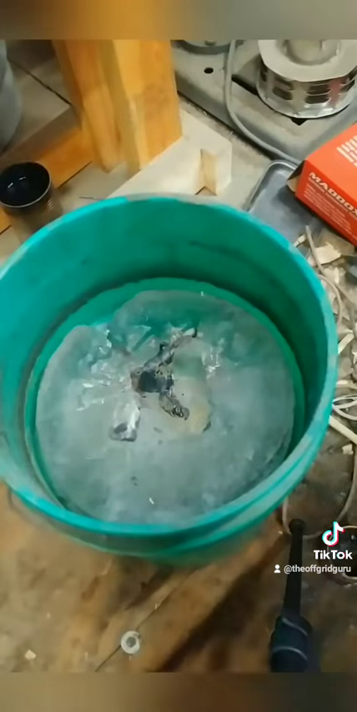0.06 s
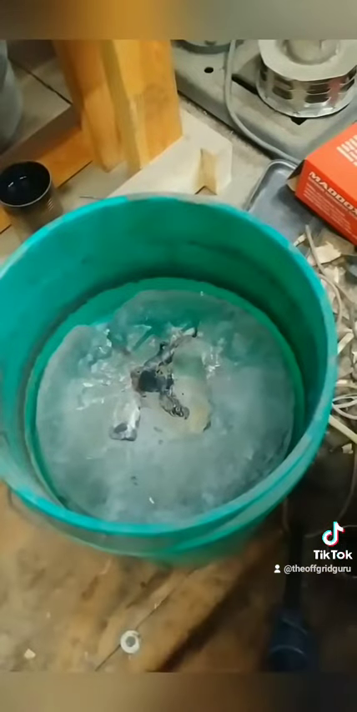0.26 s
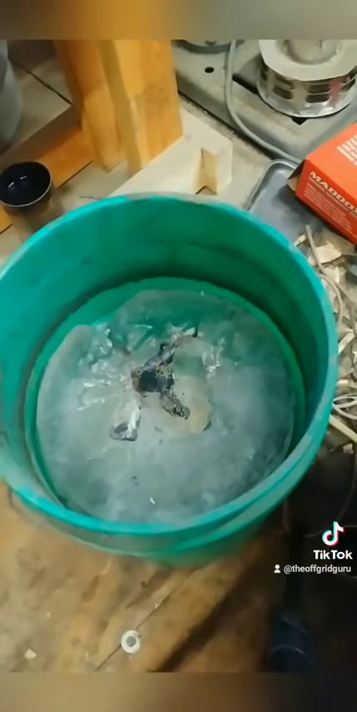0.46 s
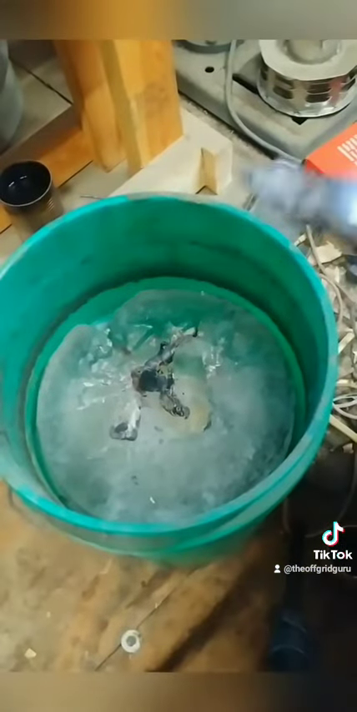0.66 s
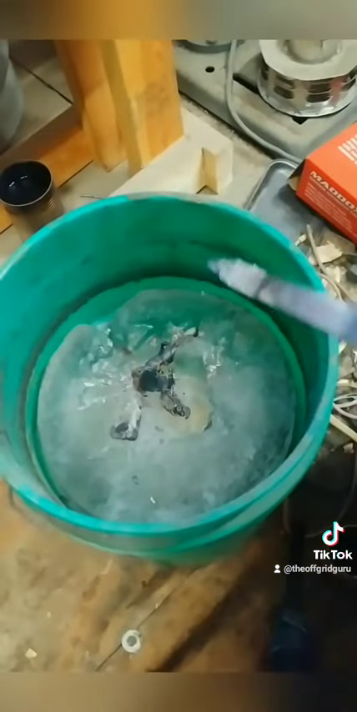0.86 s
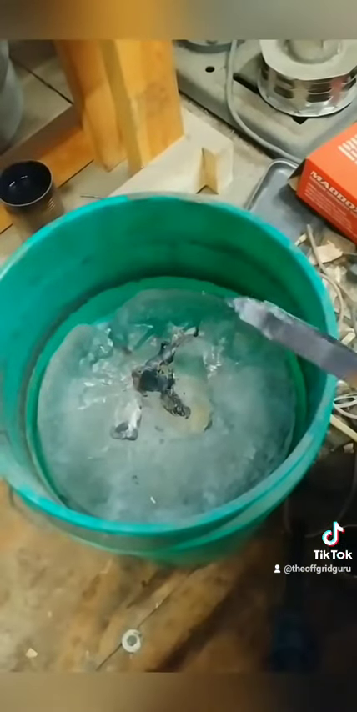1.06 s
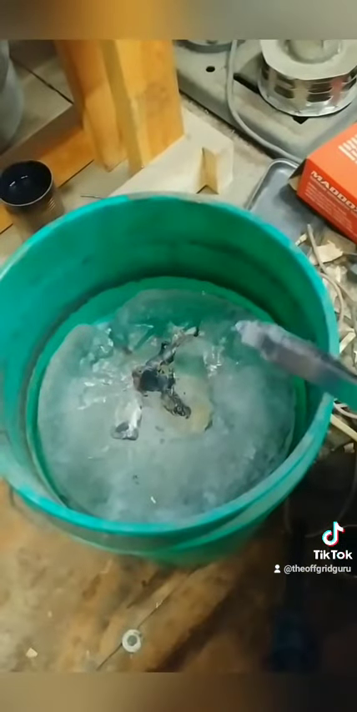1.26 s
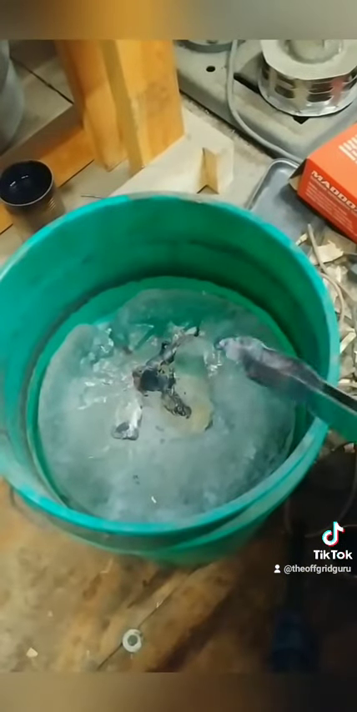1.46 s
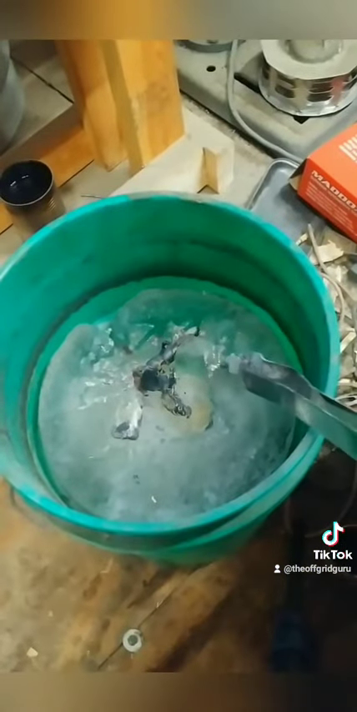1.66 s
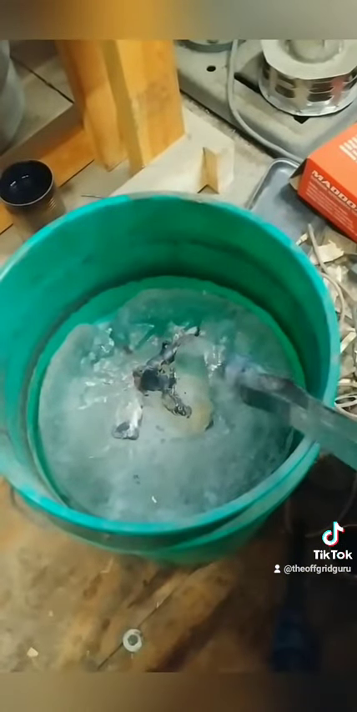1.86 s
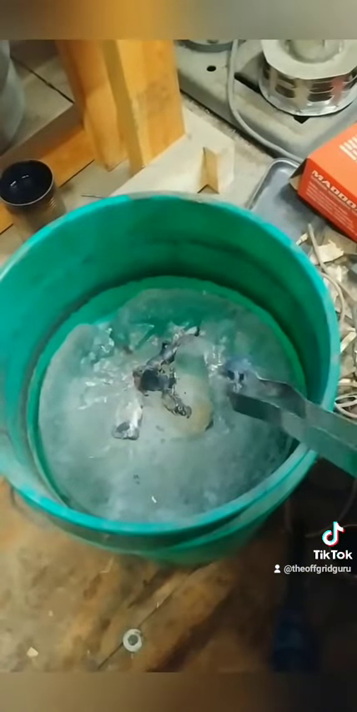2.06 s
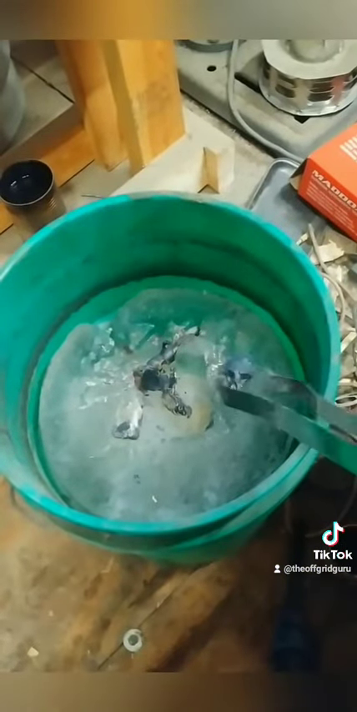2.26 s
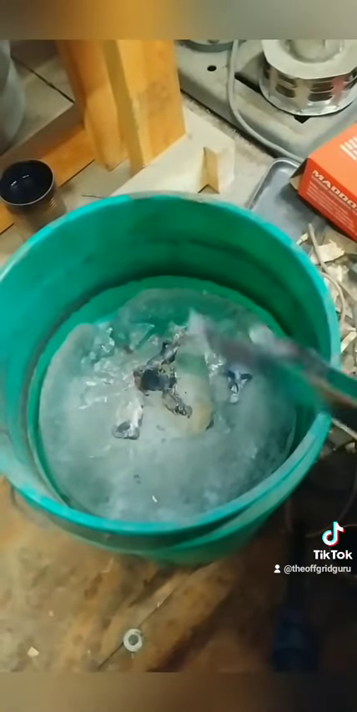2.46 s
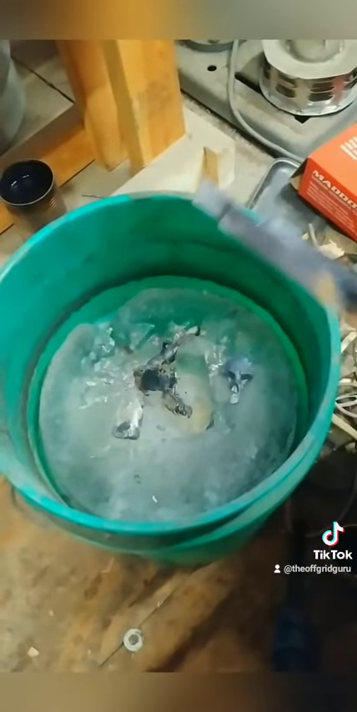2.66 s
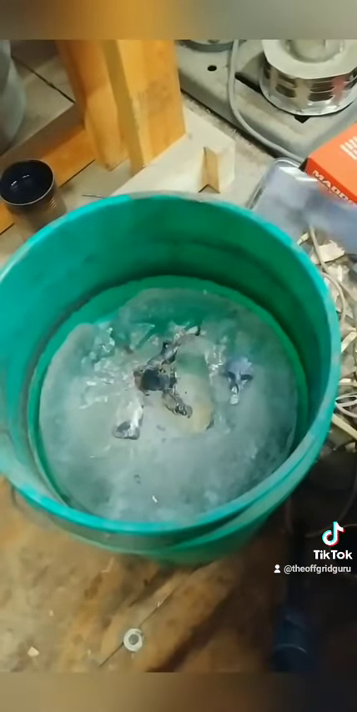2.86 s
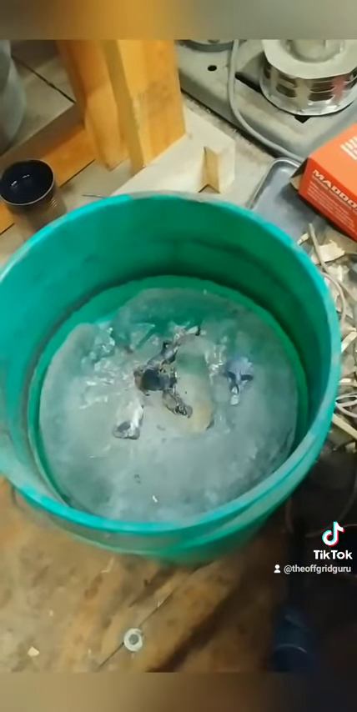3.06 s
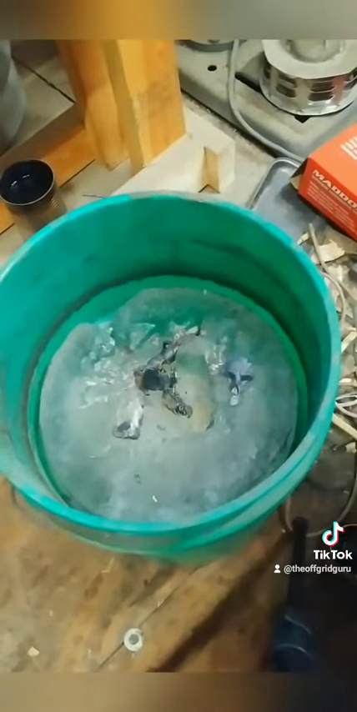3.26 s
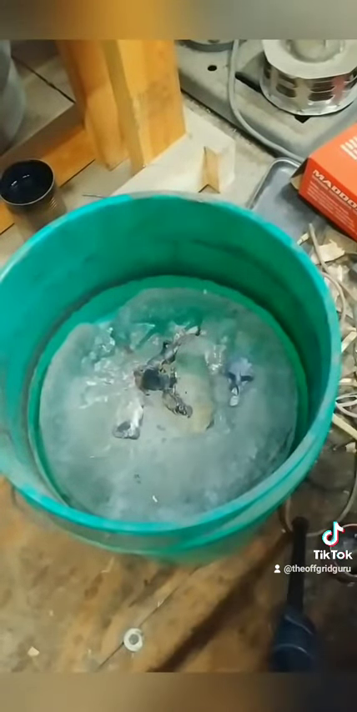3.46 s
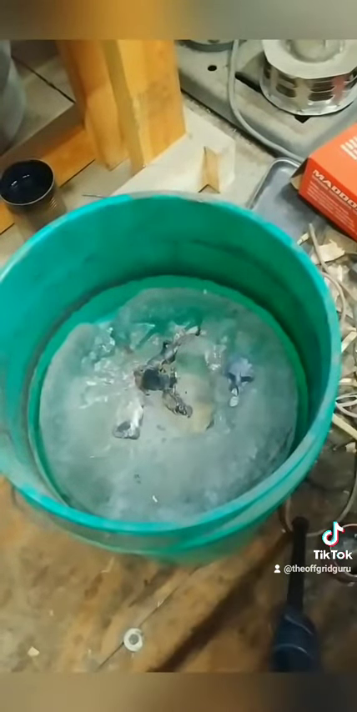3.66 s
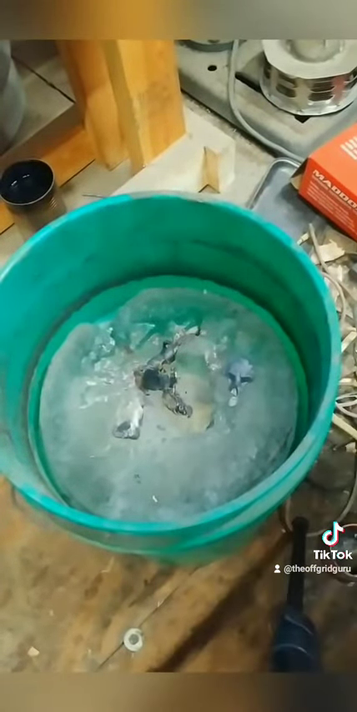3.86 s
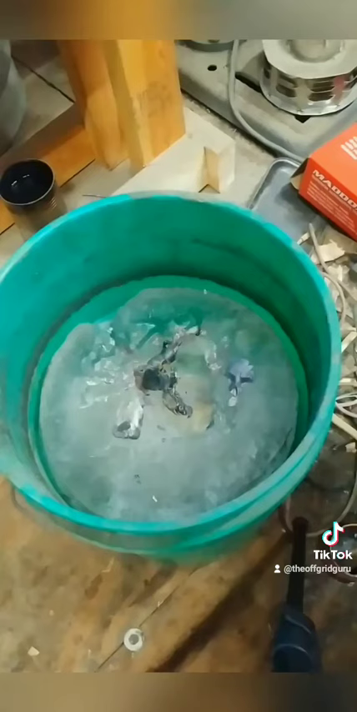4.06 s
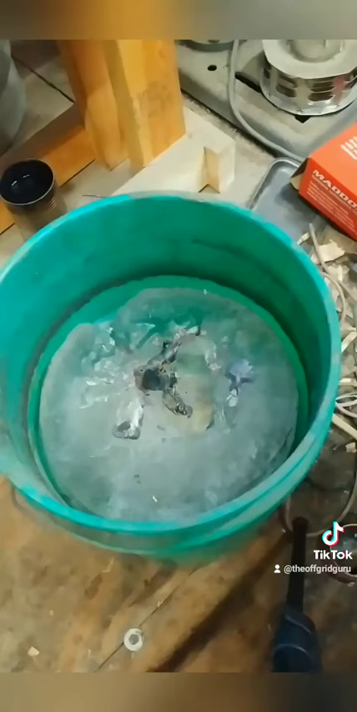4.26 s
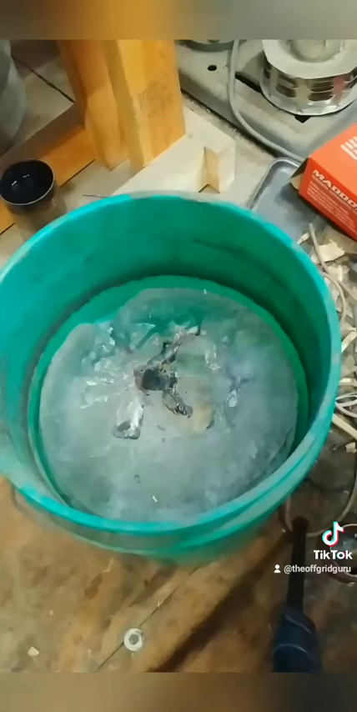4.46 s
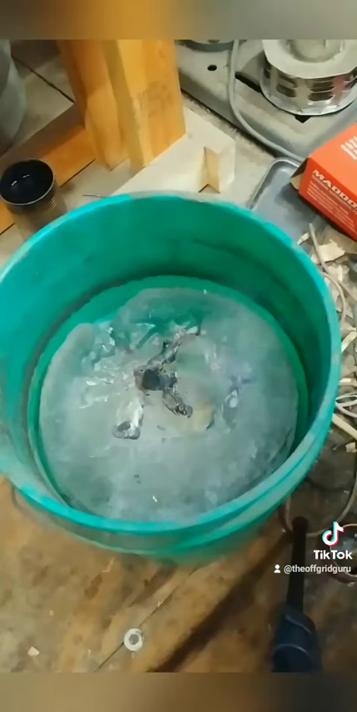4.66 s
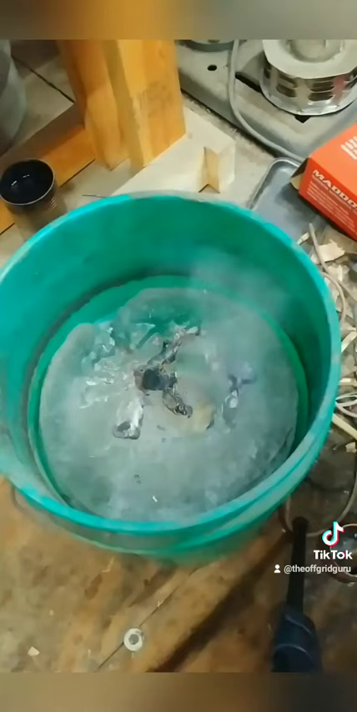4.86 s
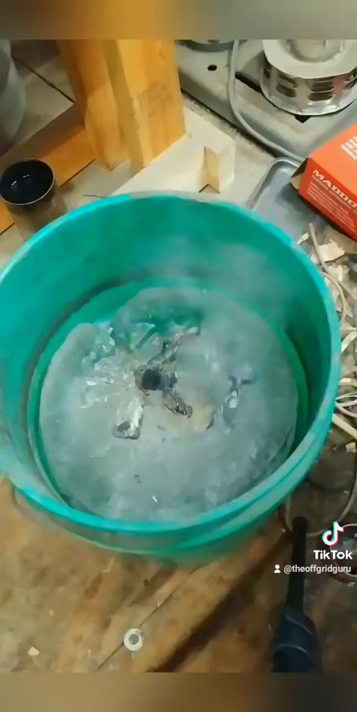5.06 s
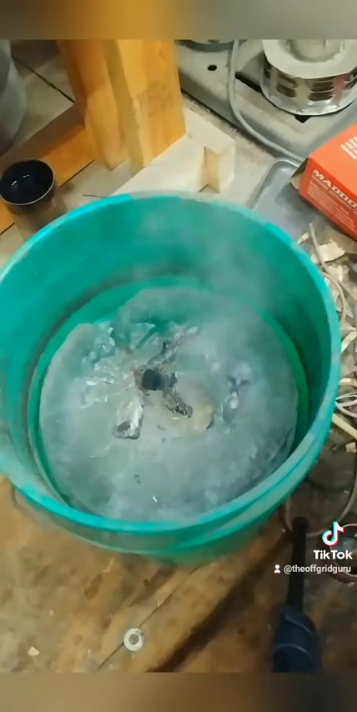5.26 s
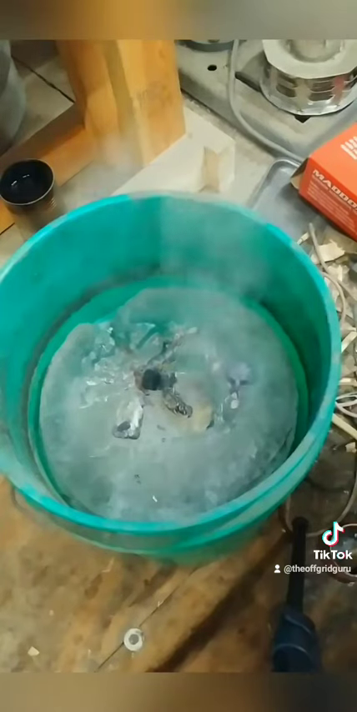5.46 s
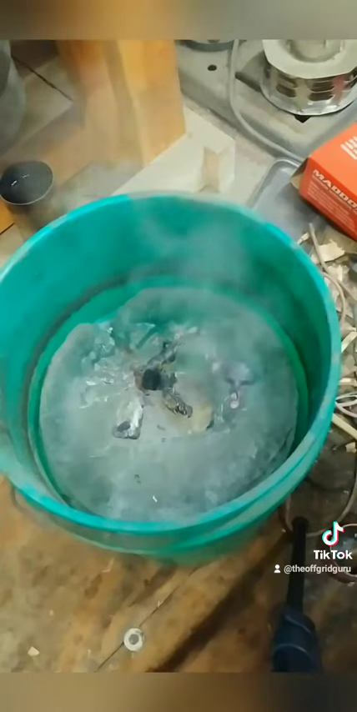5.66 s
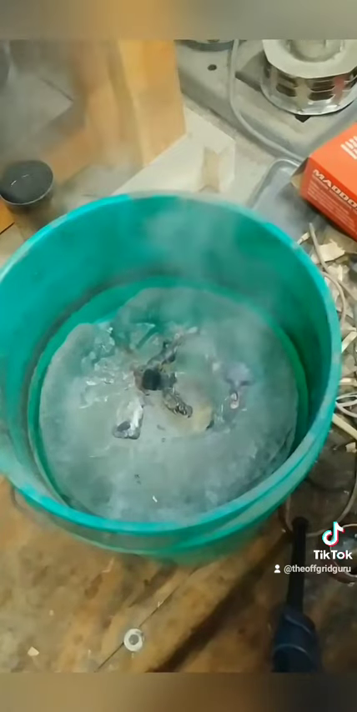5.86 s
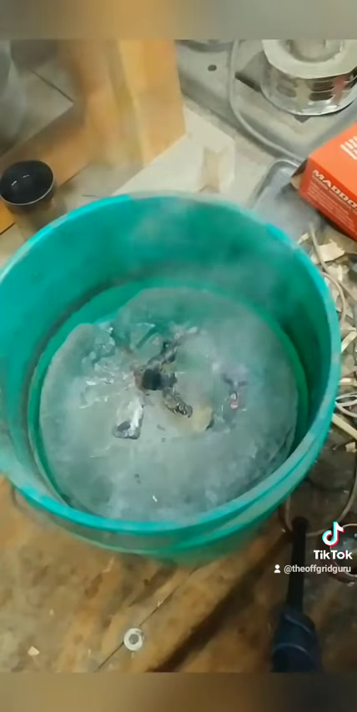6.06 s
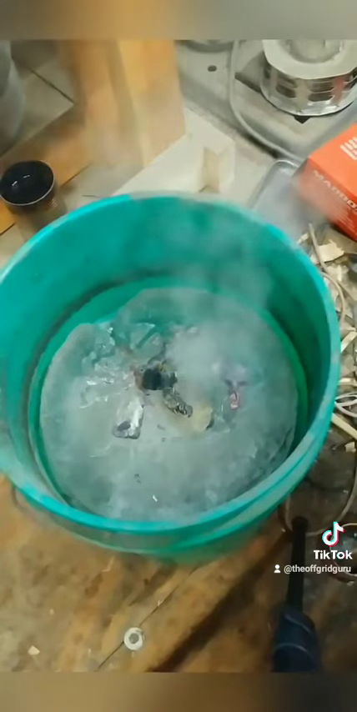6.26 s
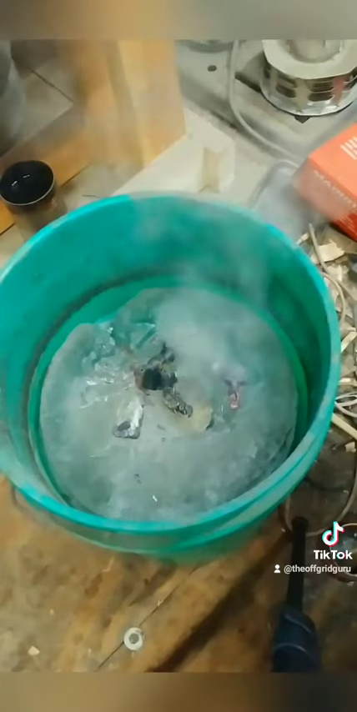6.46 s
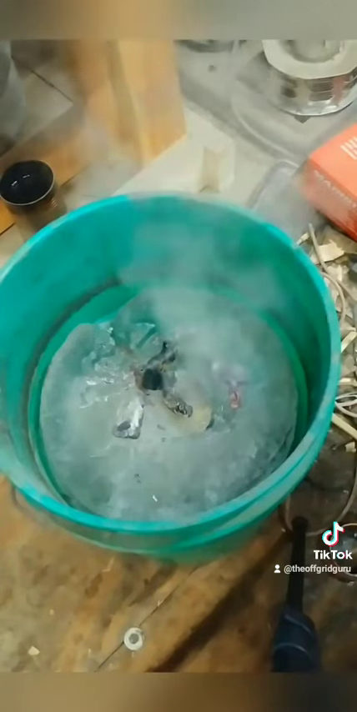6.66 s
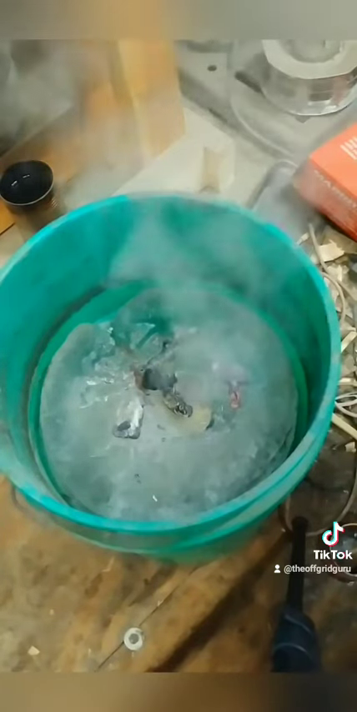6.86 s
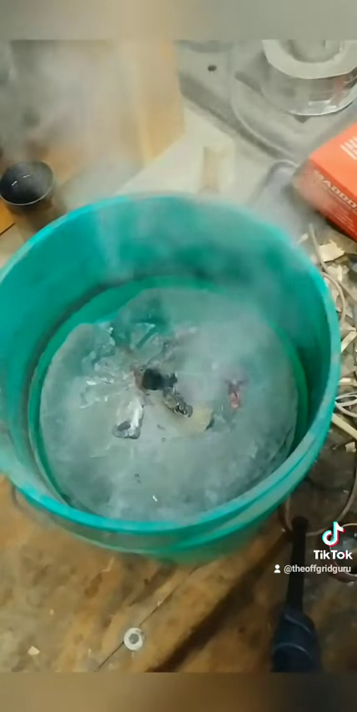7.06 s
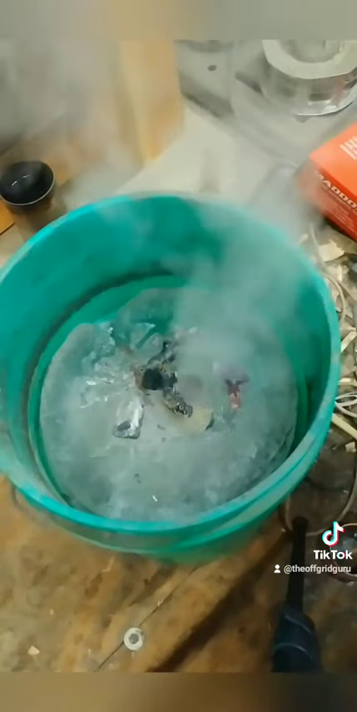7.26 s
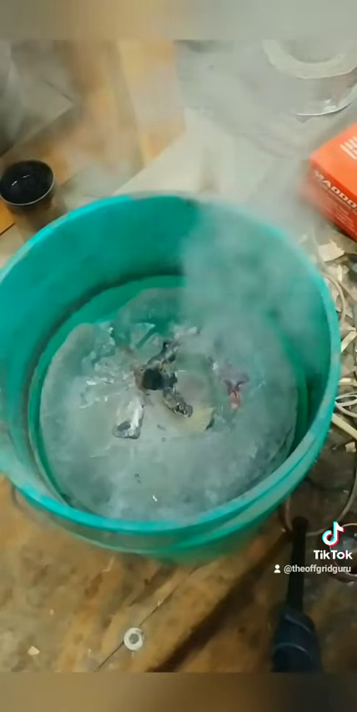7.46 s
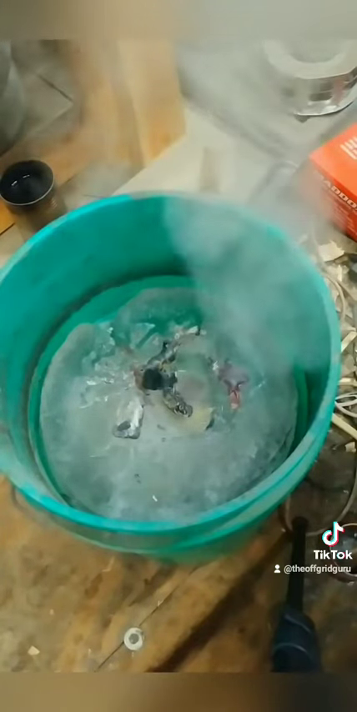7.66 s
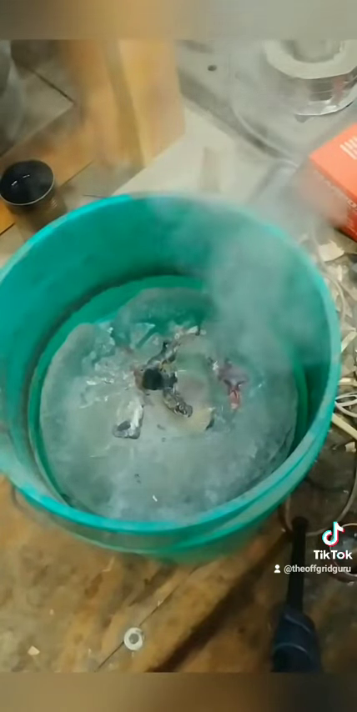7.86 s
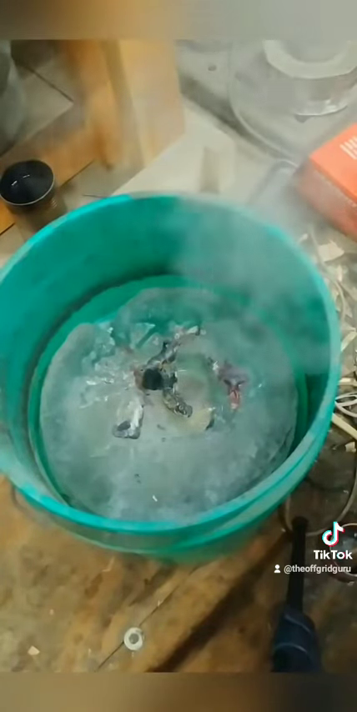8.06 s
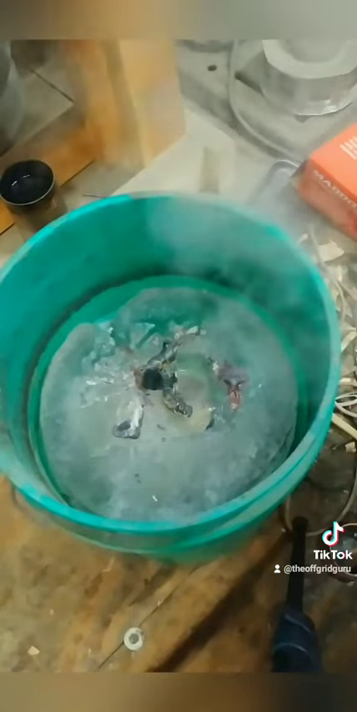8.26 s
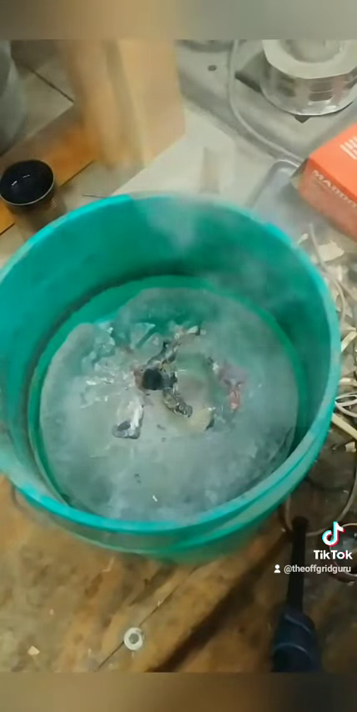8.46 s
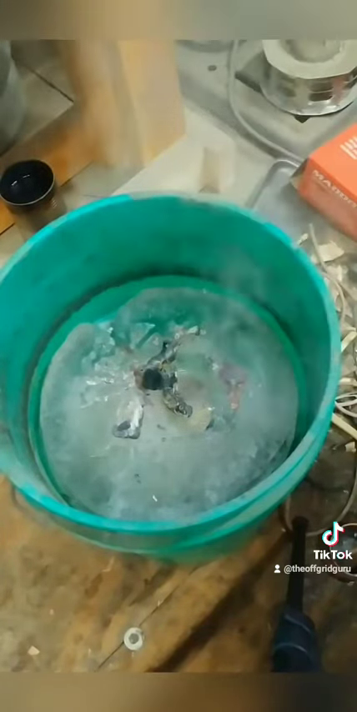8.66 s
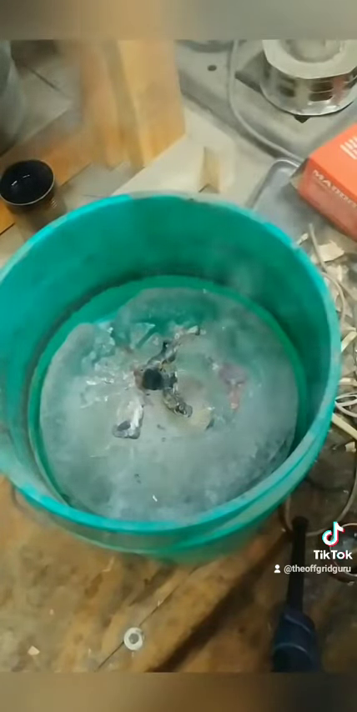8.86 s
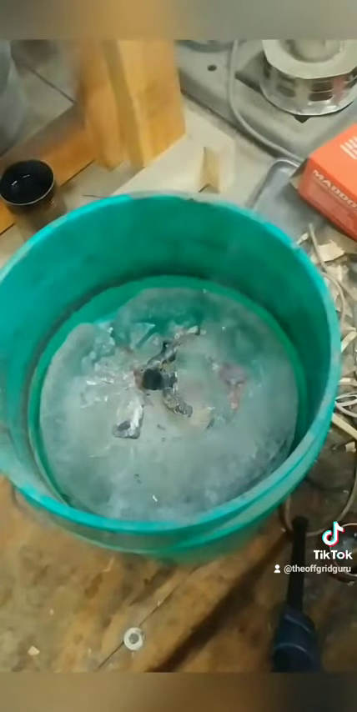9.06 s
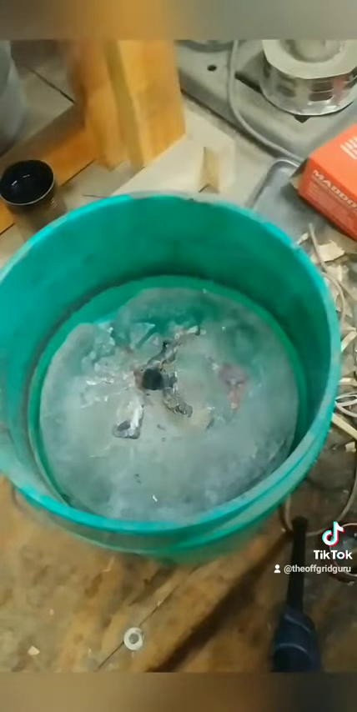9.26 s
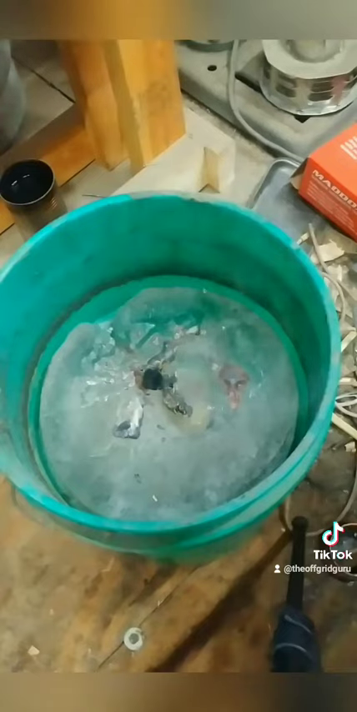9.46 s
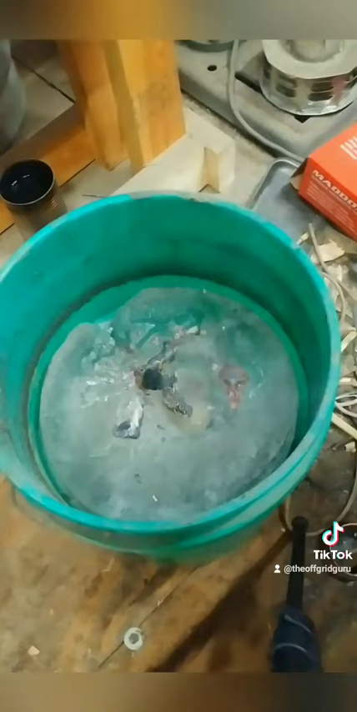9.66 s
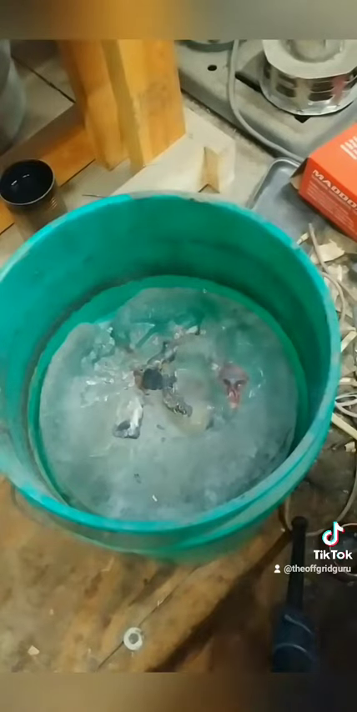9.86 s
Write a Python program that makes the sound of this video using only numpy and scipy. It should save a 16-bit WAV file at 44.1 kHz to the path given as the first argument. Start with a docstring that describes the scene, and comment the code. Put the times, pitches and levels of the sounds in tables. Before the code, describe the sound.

After a few bumps on a wooden bench, tongs click and knock red-hot metal onto wet ice in a plastic bucket. A bright sizzle starts, with small spits of steam, then swells into a loud, sputtering boil with low gurgles. It dies away quickly, leaving a soft scuff and a light clink of tongs. The sound is close and thin in the bass, in a small workshop with a faint fan hum.

```python
"""Red-hot metal quenching on wet ice in a plastic bucket, heard close up in a small workshop.
After a few bumps on the bench, tongs click and knock the metal onto the ice. It sizzles, spits as steam
pockets burst, sinks into its meltwater and boils hard, then cools and falls quiet within a second.
A fan motor hums in the background; at the end something scuffs and the tongs clink on the bench.
The microphone is thin in the deep bass and bright in the treble."""
import sys
import numpy as np
from scipy import signal
from scipy.fft import rfft, irfft
from scipy.io import wavfile

SR = 44100
rng = np.random.default_rng(int(sys.argv[2]) if len(sys.argv) > 2 else 0)


def log_audio(samples):
    """Write samples as a 16-bit WAV file to the path given in sys.argv[1]."""
    # one column per channel
    frames = np.atleast_2d(samples).T
    # limit to full scale, then quantise
    limited = np.clip(frames, -1, 1)
    pcm = np.round(limited * 32767).astype(np.int16)
    wavfile.write(sys.argv[1], SR, pcm)


N = 436590
TIME = np.arange(N) / SR
FFT_SIZE = 2 ** 14
HZ = np.maximum(np.arange(FFT_SIZE // 2 + 1) * SR / FFT_SIZE, 1)

# Levels in the tables are relative: each layer has its own gain and colour on top.
# the metal simmers, sinks, boils hard and cools: (t/s, sizzle level/dB, steam level/dB)
QUENCH = [(1.98, -50, -71), (2.06, -38.5, -50.5), (2.25, -31, -46.5), (2.55, -31.5, -45.5),
          (2.85, -34.5, -44), (3.2, -31.5, -41.5), (3.45, -32.5, -47.5), (3.82, -34.5, -48),
          (3.95, -32, -62), (4.35, -27.5, -47), (4.95, -25.5, -37), (5.35, -19, -38.5), (5.85, -16, -30.5),
          (6.84, -17, -29), (7.14, -32, -39.5), (7.4, -53.5, -53.5), (7.6, -68.5, -71)]
# air resonances and hollows of the bucket: (f/Hz, width/Hz, level/dB)
BUCKET_RESONANCES = [(381, 95, 9.5), (521, 36, 7), (710, 65, 6), (822, 78, 7), (990, 33, 9.5),
                     (1256, 146, 16), (1530, 73, 4), (1620, 21, 15), (1795, 114, 8.5), (2187, 234, 9),
                     (2450, 450, 5.5), (2540, 226, -3.5), (3070, 166, 6.5), (3455, 35, 7), (3610, 30, 4),
                     (3880, 120, 5.5), (4795, 86, 8), (5200, 170, 4), (8890, 340, -5.5), (9130, 150, -5),
                     (9200, 100, -5.5), (9930, 400, 0.5), (11000, 200, 3), (14800, 170, 2.5)]
# meltwater floods the metal all at once and boils up round it for a moment
FLOOD_S, FLOOD_HOLD_S, FLOOD_RISE_S = 4.475, 0.73, 0.028


def from_db(db):
    """Decibels to gain."""
    return 10 ** (np.asarray(db) / 20)


def unit_power(x):
    """Scale to an rms of one."""
    return x / np.sqrt(np.mean(x ** 2) + 1e-20)


def envelope(rows, column):
    """Gain over time from one dB column; silent outside the rows."""
    rows = np.array(rows)
    return from_db(np.interp(TIME, rows[:, 0], rows[:, column], left=-np.inf, right=-np.inf))


def swell(start, hold, rise, fall):
    """Gain that climbs 60 dB in rise seconds up to the start, holds, then drops 60 dB in fall seconds."""
    before = np.maximum(start - TIME, 0)
    after = np.clip(TIME - start - hold, 0, 3)
    return from_db(-60 * (before / rise + after / fall))


def drift(per_s):
    """A random wander of unit power that takes per_s new values a second."""
    return unit_power(np.interp(TIME * per_s, np.arange(N), rng.standard_normal(N)))


def response(spectrum, resonances=()):
    """Gain at every frequency: a smooth spectrum with resonance humps and dips on top."""
    hz, db = np.transpose(spectrum)
    humps = sum(top / (1 + (2 * (HZ - centre) / width) ** 2) for centre, width, top in resonances)
    return from_db(np.interp(np.log(HZ), np.log(hz), db) + humps)


def filtered(x, gain):
    """Minimum-phase filter, so that nothing sounds before its cause."""
    half = FFT_SIZE // 2
    cepstrum = irfft(np.log(gain))
    cepstrum[1:half] *= 2
    cepstrum[half + 1:] = 0
    impulse = irfft(np.exp(rfft(cepstrum)))[:half]
    return signal.oaconvolve(x, impulse)[:N]


def coloured(x, spectrum, resonances=()):
    """Give a white excitation a colour and keep its power."""
    return filtered(x, unit_power(response(spectrum, resonances)))


def pops(per_s, spread_db):
    """Tiny bubble collapses, random in time and size; unit power."""
    sizes = from_db(spread_db * np.minimum(rng.exponential(1, N), 5)) * rng.choice([-1, 1], N)
    return unit_power(sizes * (rng.random(N) < per_s / SR))


def puffs(events, rise, t60):
    """A noise burst for each (t/s, level/dB), swelling quickly and dying away."""
    age = TIME[:SR // 2]
    shape = (1 - np.exp(-age / rise)) * from_db(-60 * age / t60)
    onsets = np.zeros(N)
    for t, db in events:
        onsets[round(t * SR)] = from_db(db) ** 2
    power = signal.fftconvolve(onsets, (shape / shape.max()) ** 2)[:N]
    return np.sqrt(np.maximum(power, 0)) * rng.standard_normal(N)


def struck(blows, modes, vary_db):
    """Each blow rings every mode with a strength of its own."""
    out, age = np.zeros(N + SR), TIME[:SR // 4]
    hz, mode_db, t60 = np.transpose(modes)
    rings = np.sin(2 * np.pi * hz[:, None] * age) * from_db(-60 * age / t60[:, None])
    for t, db in blows:
        strengths = from_db(db + mode_db + vary_db * rng.standard_normal(len(hz)))
        signs = rng.choice([-1, 1], len(hz))
        start = round(t * SR)
        out[start:start + len(age)] += (strengths * signs) @ rings
    return out[:N]


def fan_motor():
    """Background of the workshop: a motor hums, wavering slightly, over its own air noise."""
    partials = [(137.5, -59.5), (275, -63), (412.5, -70), (550, -68.5), (687, -64), (1373, -71.5),
                (2057, -74), (3838, -79)]  # motor hum: (f/Hz, level/dB)
    air_colour = [(25, -30), (70, -20), (110, -10), (200, -11), (380, -5), (480, -5), (660, 3), (820, -5),
                  (1100, -11), (2000, -14.5), (4000, -21), (5300, -25), (6500, -37), (10000, -40),
                  (15000, -32)]  # moving air: (f/Hz, level/dB)
    clock = TIME + 0.000194 * drift(5)  # timing wobble: the upper partials waver most
    hum = np.zeros(N)
    for hz, db in partials:
        amplitude = np.sqrt(2) * from_db(db + 0.8 * drift(5.9))
        hum += amplitude * np.sin(2 * np.pi * (hz * clock + rng.random()))
    return hum + from_db(-56.5) * coloured(rng.standard_normal(N), air_colour)


def bench_bumps():
    """The wooden bench thuds under the tools and loose things rattle on it."""
    bumps = [(0.063, -27.5), (0.163, -31), (0.419, -17.5), (0.433, -20.5), (9.848, -32)]  # dull blows on the bench: (t/s, level/dB)
    rattles = [(0.21, -29.5), (0.42, -24), (0.444, -21), (0.46, -27.5), (9.306, -36.5), (9.726, -33.5),
               (9.774, -35.5)]  # tools jolted: (t/s, level/dB)
    wood_colour = [(30, -43), (60, -17), (100, 3.5), (165, -0.5), (240, -5), (430, -10), (700, -22.5),
                   (3000, -39), (10000, -65)]  # thudding wood: (f/Hz, level/dB)
    tool_colour = [(40, -42), (80, -17), (400, 9.5), (550, 0), (800, 11), (1100, 3.5), (1600, 5),
                   (3000, -8), (4500, -1), (6500, -26), (15000, -29)]  # rattling tools: (f/Hz, level/dB)
    thumps = from_db(-5) * puffs(bumps, rise=0.0016, t60=0.19)
    clatter = from_db(-15) * puffs(rattles, rise=0.00018, t60=0.4)
    return coloured(thumps, wood_colour) + coloured(clatter, tool_colour)


def tongs():
    """Gripping jaws click without ringing; laid down, the steel rings freely."""
    grips = [(0.2113, -35), (1.7462, -24), (1.7677, -25), (1.811, -22.5), (1.8234, -26), (1.941, -27.5),
             (7.8386, -47)]  # jaws meet the metal: (t/s, level/dB)
    clinks = [(9.722, -41), (9.729, -40.5), (9.736, -38), (9.742, -41)]  # tongs meet the bench: (t/s, level/dB)
    steel_modes = [(5800, -11, .06), (7020, -6, .1), (7400, -9, .1), (8350, 0, .12), (10100, -12, .09),
                   (10800, -15, .07)]  # ringing of the tongs: (f/Hz, level/dB, t60/s)
    click_colour = [(100, -45), (1500, -6), (3500, 4), (5500, -5), (7500, -3), (10000, -5), (12500, -13),
                    (15500, -14)]  # steel making contact: (f/Hz, level/dB)
    clicks = from_db(-19.5) * puffs(grips, rise=0.00039, t60=0.019)
    touch = from_db(-14.5) * puffs(clinks, rise=0.003, t60=0.032)
    ring = from_db(-24) * struck(clinks, steel_modes, vary_db=1.5)
    return coloured(clicks + touch, click_colour) + ring


def ice_knocks():
    """The metal lands on the ice, which crunches, and the bucket rings hollow."""
    knocks = [(1.748, -28), (1.821, -20.5), (1.863, -27.5), (1.939, -28.5)]  # metal meets ice: (t/s, level/dB)
    bucket_modes = [(690, -1.5, 0.1), (840, -2, 0.096), (1000, -9, 0.091), (1070, -8, 0.079),
                    (1160, -9.5, 0.094), (1370, -18, 0.11), (1873, -14, 0.084)]  # ringing of the bucket: (f/Hz, level/dB, t60/s)
    crunch_colour = [(40, -40), (80, -11), (220, 4), (520, -13), (800, -4), (1200, -6), (2000, -7),
                     (3000, -21), (4500, -21), (6500, -47), (15000, -40)]  # knocked ice: (f/Hz, level/dB)
    crunch = from_db(-17) * puffs(knocks, rise=0.0019, t60=0.2)
    ring = from_db(-9) * struck(knocks, bucket_modes, vary_db=1.5)
    return coloured(crunch, crunch_colour) + ring


def sizzle(pockets):
    """Microbubbles collapse on the hot face and steam rushes off, fluttering together; pockets burst."""
    sizzle_colour = [(30, -46), (150, -16), (500, -16), (1600, -17), (3000, -5.5), (5000, -2.5), (6500, -1),
                     (10000, -1.5), (15500, 2.5)]  # microbubbles and bursts: (f/Hz, level/dB)
    steam_colour = [(30, -45), (150, -8.5), (400, -7), (700, -17.5), (1000, -17.5), (1900, -12), (2300, -3),
                    (3300, -0.5), (4500, -2), (6400, -13.5), (10000, -18), (15000, -2.5)]  # rushing steam: (f/Hz, level/dB)
    flutter = from_db(1.38 * drift(300) + 0.4 * drift(16))
    fizz = from_db(-12) * envelope(QUENCH, column=1) * flutter * pops(per_s=16000, spread_db=1.5)
    bursts = from_db(-18) * puffs([(t, db) for t, db, _ in pockets], rise=0.0014, t60=0.029)
    steam = from_db(-1) * envelope(QUENCH, column=2) * flutter * pops(per_s=14000, spread_db=3.5)
    return (coloured(fizz + bursts, sizzle_colour, BUCKET_RESONANCES)
            + coloured(steam, steam_colour, BUCKET_RESONANCES))


def steam_pockets(small_count):
    """When steam pockets burst and how hard: the loud ones, plus small ones scattered through the flood."""
    loud = [(3.538, -21, -24), (3.57, -18, -40), (3.606, -21, -28), (3.647, -22, -22),
            (3.707, -19.5, -22.5), (3.775, -21, -24), (3.805, -24, -28), (3.851, -28, -27.5),
            (4.471, -11, -17.5), (4.487, -12.5, -18.5), (4.598, -10, -18.5), (4.625, -28, -17.5),
            (4.706, -14, -19.5), (4.766, -10, -21), (4.805, -8.5, -15), (4.877, -15, -16),
            (4.949, -11.5, -39), (5.044, -12, -13), (5.078, -9.5, -14), (5.237, -21, -17.5)]  # pockets that burst and throw drops: (t/s, burst level/dB, spit level/dB)
    times = FLOOD_S + FLOOD_HOLD_S * (np.arange(small_count) + rng.random(small_count)) / small_count
    levels_db = rng.normal([-18, -24], 4.4, (small_count, 2))  # burst, spit
    return np.vstack([loud, np.column_stack([times, levels_db])])


def spitting(pockets):
    """Each bursting steam pocket throws drops."""
    spit_colour = [(100, -16), (600, -9), (1200, -9), (1800, -9), (2800, -4), (5000, -12.5), (6500, -19),
                   (10000, -21), (15000, -7.5)]  # spitting drops: (f/Hz, level/dB)
    spits = from_db(-8.5) * puffs([(t, db) for t, _, db in pockets], rise=0.00029, t60=0.039)
    return coloured(spits, spit_colour, BUCKET_RESONANCES)


def boiling():
    """Meltwater floods the metal with a splash and boils up in a sputter."""
    boil_colour = [(60, -53), (250, -14.5), (450, -0.5), (750, 9), (1050, 3.5), (1350, -7.5), (1700, -10),
                   (3000, -4.5), (6000, -12), (15000, -46)]  # boiling water: (f/Hz, level/dB)
    flood = from_db(-36.5) * swell(FLOOD_S, hold=FLOOD_HOLD_S, rise=FLOOD_RISE_S, fall=0.38)
    splash = from_db(-31.5) * swell(FLOOD_S, hold=0, rise=FLOOD_RISE_S, fall=0.1)
    boil = (flood + splash) * from_db(1.7 * drift(110)) * pops(per_s=900, spread_db=2)
    return coloured(boil, boil_colour, BUCKET_RESONANCES)


def gurgling():
    """From the flood on, large bubbles gurgle under the metal, following a share of the sizzle's swing."""
    heaves = [(6.09, -38.5), (6.36, -41.5), (6.86, -42)]  # the biggest bubbles heave up: (t/s, level/dB)
    gurgle_colour = [(40, -38), (130, -9), (240, -10), (330, -3.5), (430, -2.5), (560, -9), (900, -13.5),
                     (3000, -26)]  # deep bubbling: (f/Hz, level/dB)
    sizzle_gain = envelope(QUENCH, column=1)
    vigour = (sizzle_gain / sizzle_gain.max()) ** 0.24
    bubbling = from_db(-40.5) * vigour * swell(FLOOD_S, hold=2.784, rise=FLOOD_RISE_S, fall=0.68)
    glugs = sum(from_db(db) * swell(t, hold=0, rise=0.31, fall=0.57) for t, db in heaves)
    gurgle = (bubbling + glugs) * from_db(2.1 * drift(30)) * pops(per_s=500, spread_db=-1.5)
    return coloured(gurgle, gurgle_colour, BUCKET_RESONANCES)


def bench_scuff():
    """Something scuffs softly across the bench, swelling and fading."""
    scuff_colour = [(60, -28), (200, 6), (500, 4), (800, -1), (1500, -14), (4000, -16.5), (6500, -35.5),
                    (15000, -44)]  # rubbing on wood: (f/Hz, level/dB)
    scuff = from_db(-41.5) * swell(7.98, hold=0, rise=0.21, fall=0.2) * rng.standard_normal(N)
    return coloured(scuff, scuff_colour)


def in_bucket(x):
    """The narrow walls throw back mostly treble, which ripples the hiss."""
    echoes = [(.0009, -41), (.0017, -19), (.0027, -19), (.0041, -12.5), (.0062, -17.5)]  # off the bucket's walls: (delay/s, level/dB)
    treble = np.diff(x, prepend=0)
    return x + sum(from_db(db) * np.interp(TIME - delay, TIME, treble, left=0) for delay, db in echoes)


def in_room(x, t60, wet_db):
    """Dense reflections from the room follow the direct sound and die away."""
    age = TIME[:SR // 2]
    tail = rng.standard_normal(len(age)) * from_db(-60 * age / t60) * (age > 0.002)
    return x + from_db(wet_db) * signal.fftconvolve(x, tail / np.linalg.norm(tail))[:N]


def scene():
    """Bucket, tongs and bench up close, with the small room's short tail; the fan motor behind them."""
    pockets = steam_pockets(small_count=32)
    quench = in_bucket(sizzle(pockets) + spitting(pockets) + boiling() + gurgling())
    near = quench + tongs() + ice_knocks() + bench_bumps() + bench_scuff()
    return (in_room(near, t60=0.41, wet_db=-8.5) + fan_motor())[None]


def record(dry):
    """One microphone: it drops the deep bass, its port rings near 6.4 kHz, and the top is cut."""
    microphone = [(30, -4.5), (100, -5.5), (5000, 6), (5750, 16.5), (6000, 25.5), (6450, 28), (6900, 23.5),
                  (7300, 17), (7520, 18), (8000, 10), (8800, 10), (10400, 9), (12000, -3), (12700, -2),
                  (13600, -10.5), (15300, -10)]  # frequency response: (f/Hz, level/dB)
    heard = filtered(dry[0], response(microphone))
    top_cut = signal.ellip(12, 0.1, 80, 15550, fs=SR, output="sos")  # low-pass at 15.55 kHz
    return signal.sosfilt(top_cut, heard)[None]


dry = scene()
out = record(dry)
log_audio(out)
```